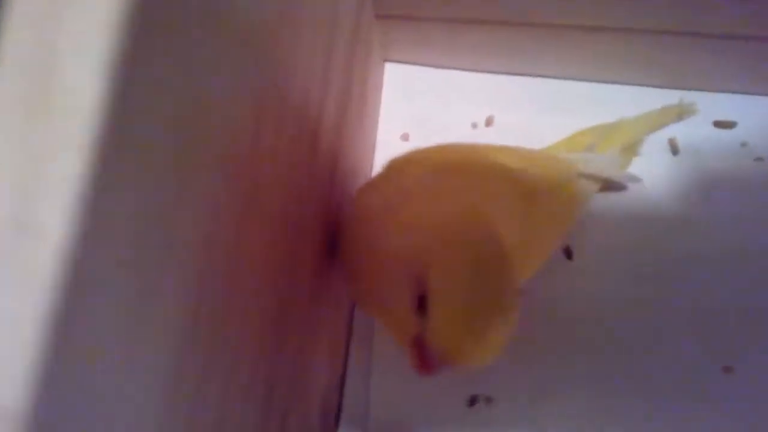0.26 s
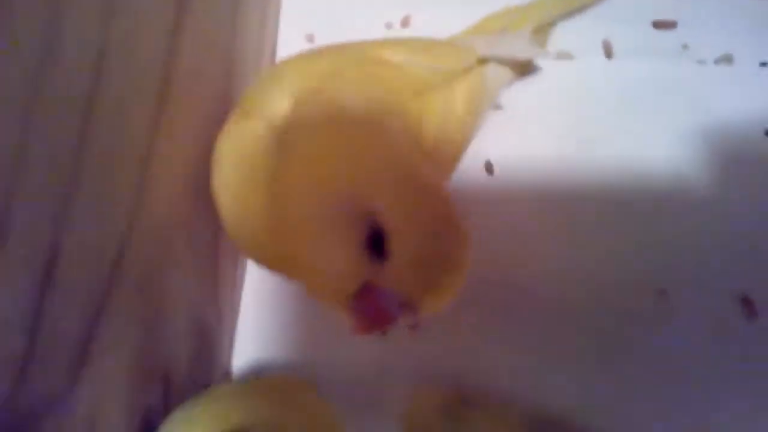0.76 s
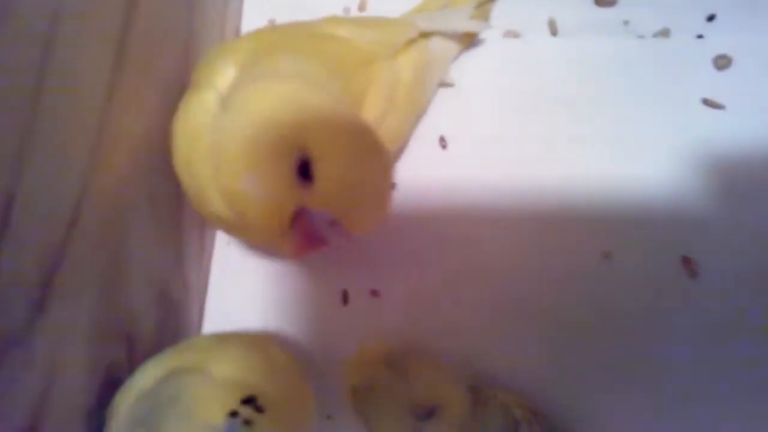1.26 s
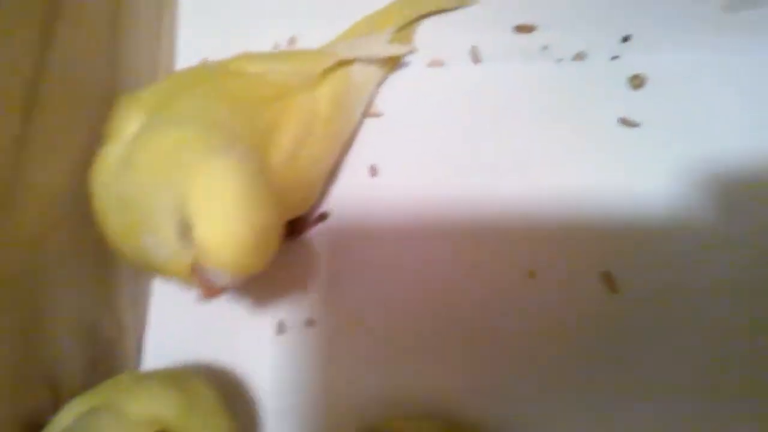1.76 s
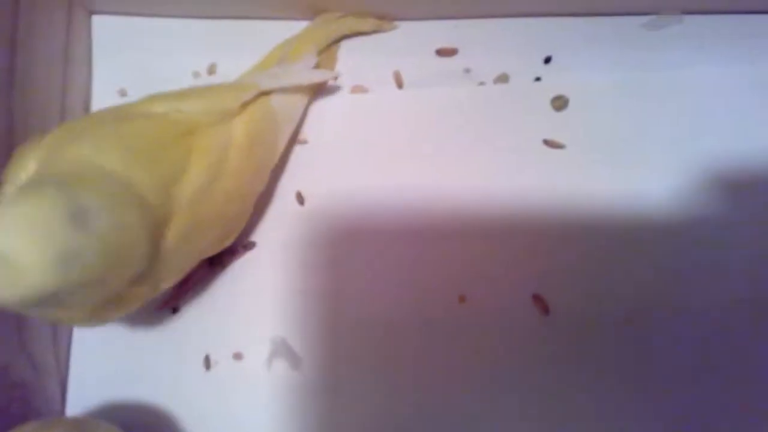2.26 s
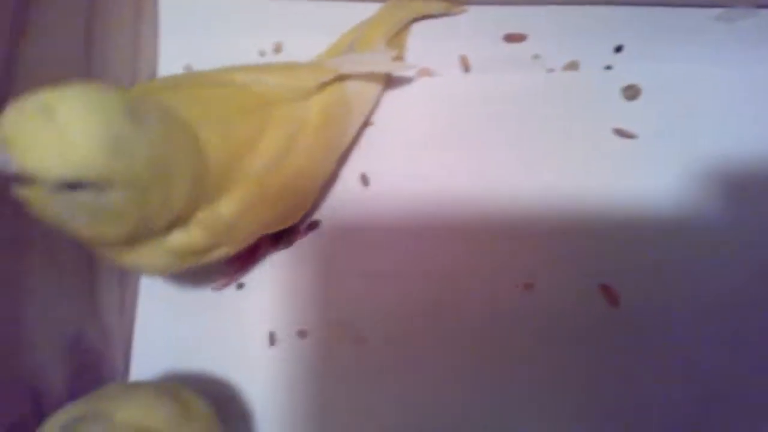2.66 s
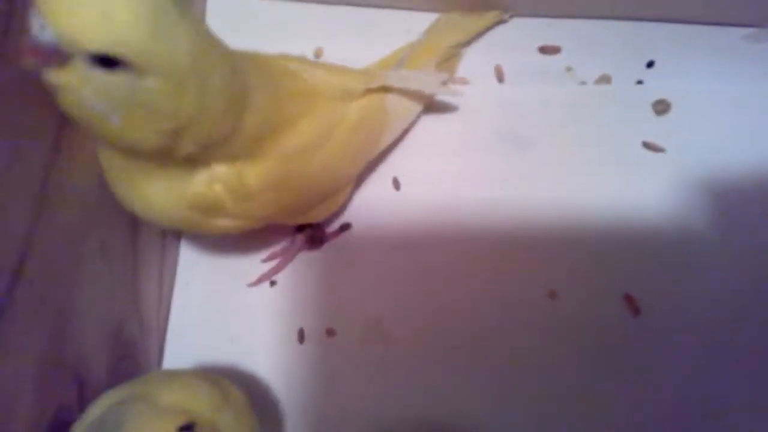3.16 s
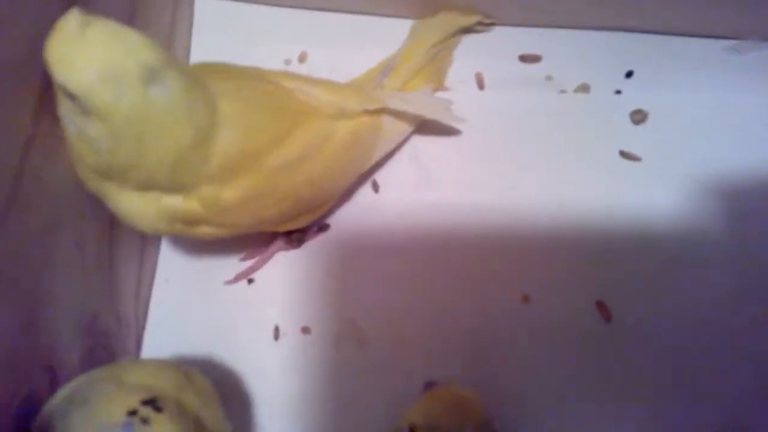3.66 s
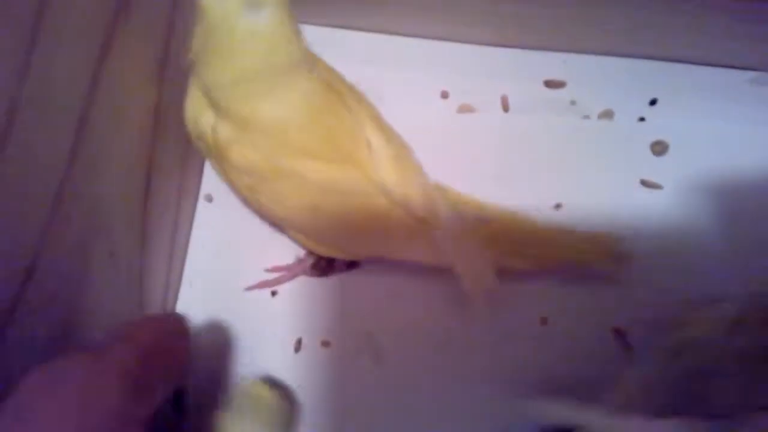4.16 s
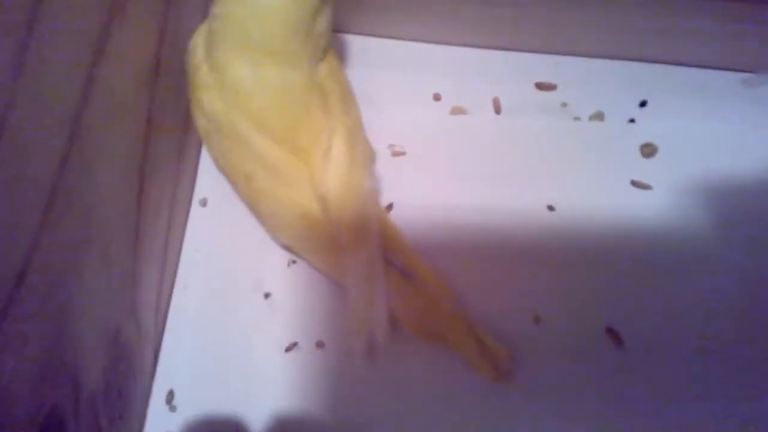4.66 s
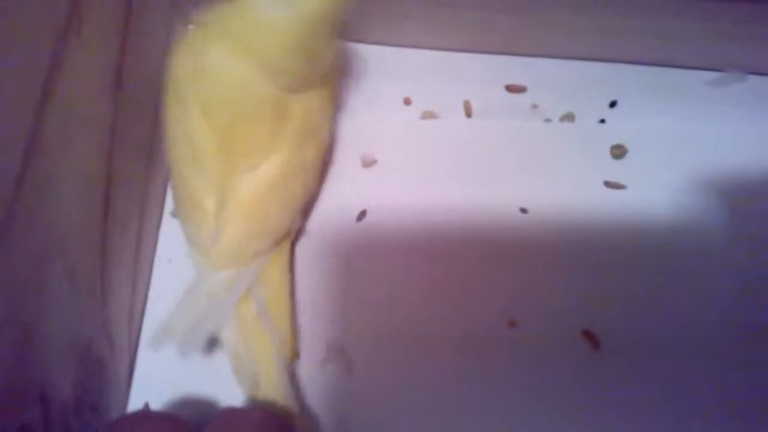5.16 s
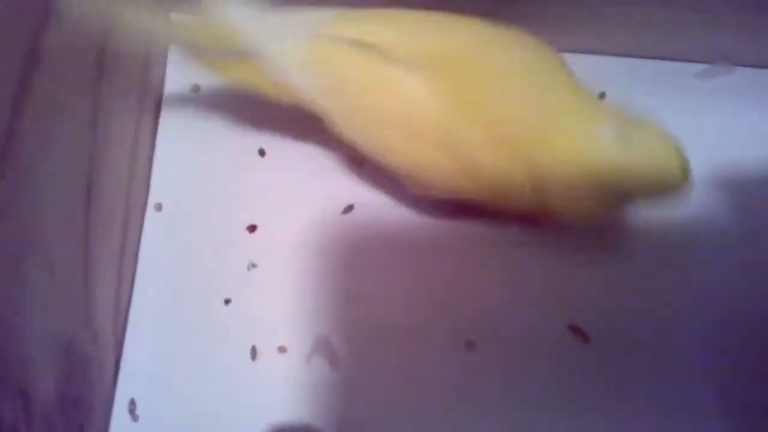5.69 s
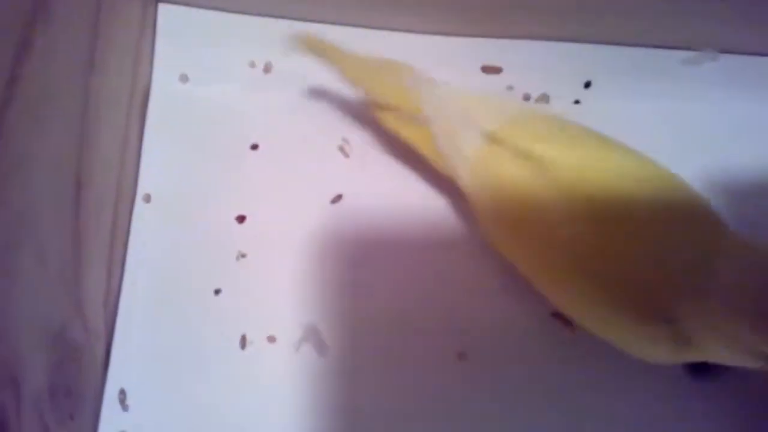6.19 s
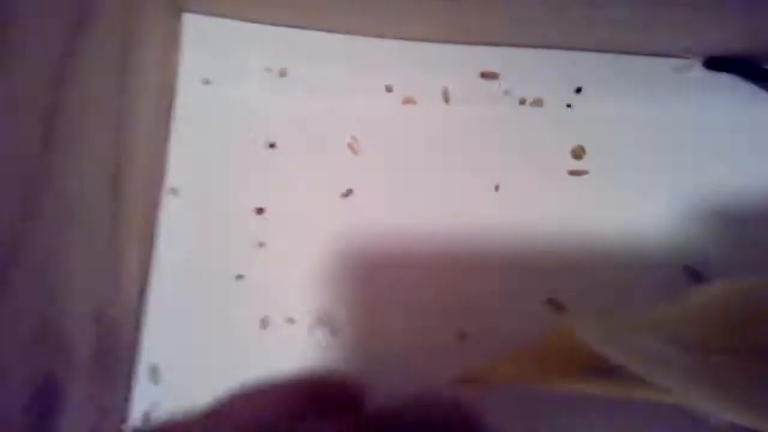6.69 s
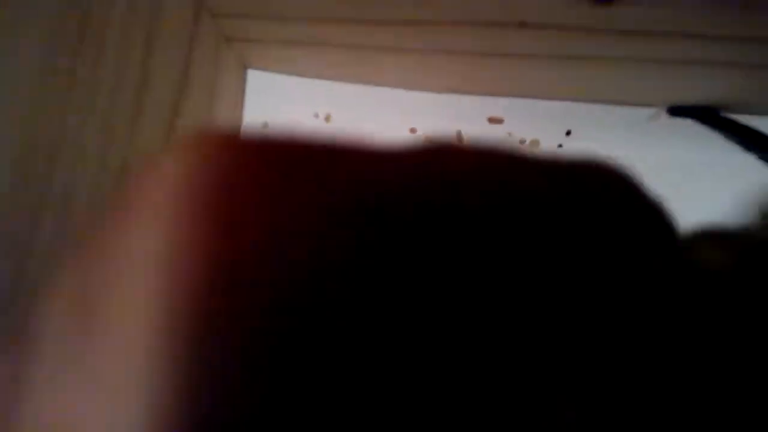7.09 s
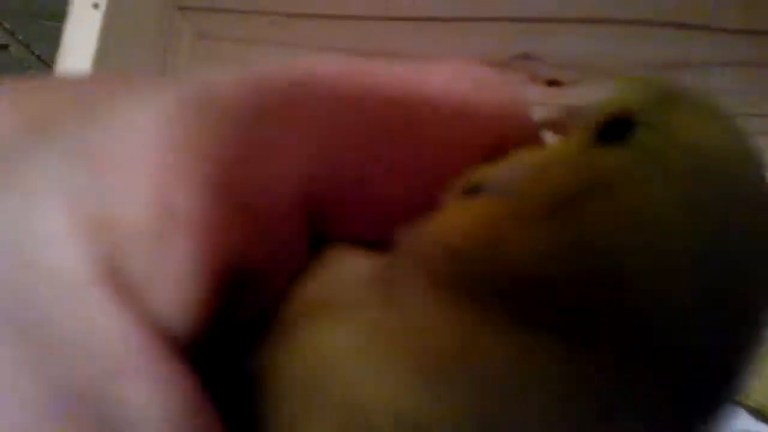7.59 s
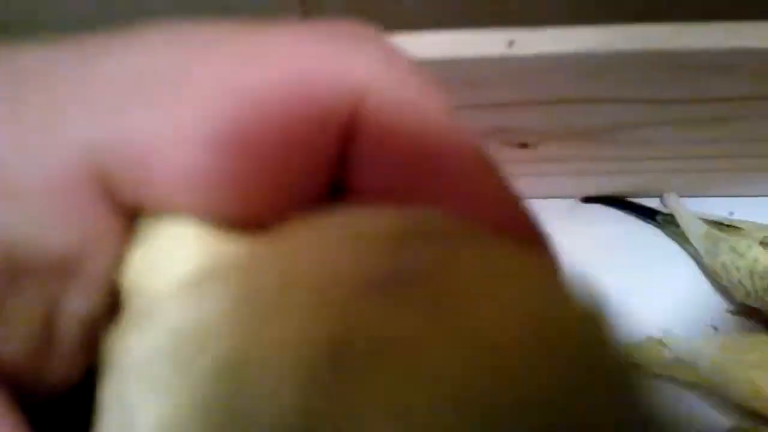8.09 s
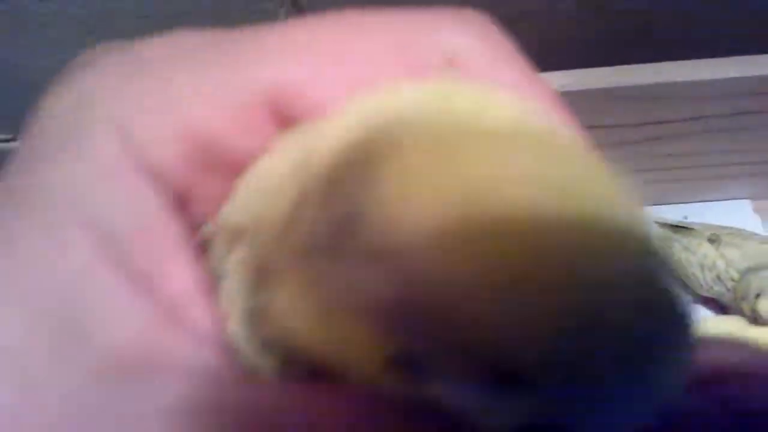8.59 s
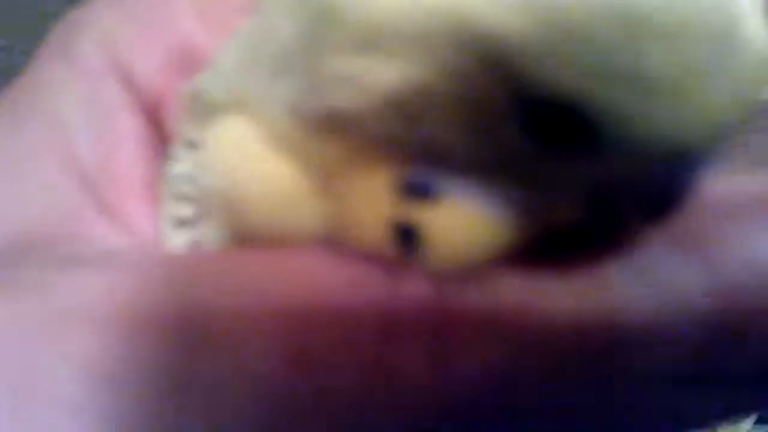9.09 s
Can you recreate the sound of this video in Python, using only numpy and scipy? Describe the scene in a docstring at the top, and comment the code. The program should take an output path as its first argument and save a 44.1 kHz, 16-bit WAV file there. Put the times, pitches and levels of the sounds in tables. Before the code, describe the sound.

Claw clicks, papery scratches and crackling husks patter irregularly over a hollow wooden floor, heard very near with slight steady hiss. The activity eases after a second and a half, bursts up around four seconds with woody knocks and scrapes, slackens, then becomes a quick hard scrabble near seven seconds. After that there is almost nothing but soft hiss and a tiny rustle.

```python
"""Parakeets in a nest box

Young parakeets shuffle on the sheet lining a small wooden nest box; a hand reaches in to lift one out.
Claws tick and skid among husks (resonant noise bursts, decaying grains); feet and knuckles thump the box
(rounded pushes into ringing modes); feathers and skin rub (noise under contact gains); short hollow scuffs
and rustles, of feet or hand, are noise in one resonance. Steady hiss lies underneath, joined by a faint
hiss around 4 kHz as the bustle dies away."""
import sys
import numpy as np
from scipy import signal
from scipy.fft import rfft, irfft
from scipy.io import wavfile

SR = 44100
rng = np.random.default_rng(int(sys.argv[2]) if len(sys.argv) > 2 else 0)


def master_out(mix):
    """Clip the mix to full scale and print it as 16-bit PCM to the path in sys.argv[1]."""
    frames = np.transpose(np.atleast_2d(mix))
    ceiling = np.clip(frames, -1, 1)
    pcm = np.round(ceiling * 32767).astype(np.int16)
    wavfile.write(sys.argv[1], SR, pcm)


N = 411879  # samples

# microphone and room noise spectrum, before overall scaling: f/Hz, density/dB per Hz
HISS_SPECTRUM = [(15, -62.5), (25, -20.5), (76, -2.5), (290, -2.5), (394, -3.5), (1010, -7.5),
                 (3370, -12.5), (4370, -15), (7000, -14), (8600, -33)]
HISS_RMS_DB = -62.5
BAND_TOP_HZ, CUTOFF_HZ = 8340, 9157

# bird activity as scratching on the sheet: t/s, level/dB
BUSTLE = [(0.0, -51.5), (0.55, -53.5), (0.82, -55.5), (1.2, -53), (1.4, -64), (1.94, -68.5), (2.3, -59),
          (2.55, -69.5), (3.45, -64), (3.9, -67), (4.05, -44.5), (4.35, -44.5), (4.7, -50), (5.55, -55.5),
          (6.2, -52.5), (7.25, -52.5), (7.45, -58.5), (7.76, -71), (8.4, -76)]
FLOOR_UNDER_DB, WALL_UNDER_DB = -11, -4.5  # bustle's rubbing on floor and wall, re scratching
# single sweeps of tail, wing or skin: start/s, length/s, sheet/dB, floor/dB, wall/dB
SWEEPS = [(0.162, 0.11, -48.5, -74, -50), (0.467, 0.072, -48.5, -61, -62), (0.58, 0.24, -51.5, -64, -51),
          (1.083, 0.14, -87, -51, -47), (2.38, 0.13, -58.5, -63, -65), (3.065, 0.11, -60.5, -65, -70),
          (3.193, 0.077, -52.5, -67, -70), (3.461, 0.13, -77, -74, -43.5), (3.979, 0.071, -44.5, -47, -58),
          (4.459, 0.055, -36.5, -62, -55), (4.94, 0.14, -43, -58, -40), (4.98, 0.26, -47.5, -76, -55),
          (5.19, 0.43, -56, -67, -53), (5.634, 0.098, -45, -75, -45.5), (5.757, 0.1, -54.5, -76, -77),
          (6.223, 0.14, -46, -45, -38), (6.605, 0.14, -47.5, -69, -66), (8.078, 0.2, -70, -70, -66)]
SWEEP_GRAIN = 0.63  # gain of husk crackle in a sweep, re brushing
# hand dragging along the boards: t/s, floor/dB, wall/dB
HAND_DRAG = [(3.5, -73, -65), (3.62, -71, -35.5), (3.68, -50, -50), (3.74, -49.5, -35.5),
             (3.86, -48.5, -33.5), (4.12, -53.5, -40), (4.28, -47.5, -33.5), (4.54, -56.5, -53.5),
             (4.8, -53, -41)]
# lining sheet resonances: f/Hz, width/Hz, level/dB
SHEET_MODES = [(960, 870, -9), (2143, 208, 0.5), (2680, 5450, -4), (4790, 3540, 0), (5900, 1220, -4.5)]

# claw and husk ticks: t/s, snap peak/dB, contact pitch f/Hz, skid re snap peak/dB
TICKS = [(0.0014, -14, 4230, -12), (0.0528, -24.5, 3570, -3.5), (0.187, -27, 3550, 1),
         (0.3096, -32, 3270, 5), (0.3418, -15.5, 2500, -10.5), (0.415, -37.5, 2730, 0),
         (0.457, -23, 3540, -2), (0.4743, -23, 3470, -12), (0.52, -31.5, 3430, -6), (0.5526, -33, 4900, -5),
         (0.582, -40, 3680, 3), (0.709, -23.5, 3770, -3), (0.764, -32, 3900, -18), (0.7717, -28, 3800, -8),
         (0.7842, -28.5, 5800, -14), (0.852, -24.5, 4350, -6), (0.951, -34, 5730, -23),
         (0.9842, -27.5, 4400, -4), (1.019, -29, 2420, -9), (1.082, -34.5, 4770, -31),
         (1.1037, -33, 5870, -29), (1.1137, -34, 4130, -3.5), (1.154, -31, 3750, -14),
         (1.1912, -40, 1450, 1), (1.2612, -29, 4600, -20), (1.2897, -14, 3600, -18),
         (1.3224, -27.5, 4340, -18), (1.455, -38, 4400, -34), (1.5277, -16, 4700, -21),
         (1.5357, -32, 5960, -4), (1.5575, -30, 5600, -6), (1.5847, -34.5, 4700, -14),
         (1.6125, -41.5, 5400, -15), (1.9923, -40, 3900, -4), (2.0398, -24.5, 4400, -12),
         (2.0436, -24.5, 2370, -6.5), (2.177, -27.5, 5300, -47), (2.2532, -23.5, 3960, -10),
         (2.362, -24, 4050, -9.5), (2.717, -30, 5900, -6.5), (2.808, -27.5, 2070, -2.5),
         (3.1398, -28, 4800, -4), (3.2022, -32.5, 5360, -12), (3.9187, -22, 3920, -11.5),
         (4.001, -26, 5500, -10), (4.1689, -23.5, 3630, -5), (4.208, -14, 2950, -11),
         (4.2604, -31, 2330, -29), (4.2864, -21, 3920, -8), (4.32, -27, 1960, -23),
         (4.3532, -14, 3360, -12), (4.3634, -17.5, 3480, -35), (4.3941, -12.5, 2950, -4),
         (4.4425, -21.5, 1670, -7), (4.5633, -26, 6800, -15), (4.57, -14.5, 2340, -14.5),
         (4.629, -19.5, 2400, -30), (4.6502, -15.5, 1580, -17), (4.8174, -22, 2180, -12),
         (4.875, -26.5, 3280, -8.5), (4.9355, -17, 2210, -14), (5.0431, -17.5, 4630, -4.5),
         (5.1991, -20, 1500, -5), (5.4378, -25, 6310, -17), (5.468, -39, 3900, 0),
         (5.585, -27.5, 3200, 1.5), (5.6, -25.5, 3150, -10), (5.699, -22.5, 4070, -3),
         (5.7544, -30, 3500, 4), (5.919, -29, 4230, -7), (5.9774, -32, 3430, -9),
         (6.0038, -29.5, 3700, 1.5), (6.135, -30.5, 3260, -10), (6.1519, -34, 3700, -1),
         (6.258, -17.5, 2530, -14.5), (6.2921, -19, 6130, -14), (6.3574, -14, 3270, -20.5),
         (6.4202, -32, 6270, -17), (6.4845, -25, 3370, 4), (6.5573, -36.5, 2020, -2.5),
         (6.6419, -25, 4370, -5), (6.7615, -8.5, 2890, -25), (6.789, -32, 3440, 2),
         (6.8378, -30.5, 4050, -1), (6.8754, -14, 3450, -21), (6.932, -30.5, 3960, -4),
         (6.9494, -14, 3360, -8.5), (6.9772, -30, 2800, -14), (7.119, -25, 3900, -8.5),
         (7.195, -13, 3480, -29), (7.256, -32, 3850, -16), (7.2692, -11.5, 3570, -21),
         (7.2818, -26.5, 1940, -2.5), (7.3373, -21, 3360, -9), (7.3718, -16.5, 2800, -9),
         (7.4286, -17, 3030, -20)]
SNAP_RISE_S, SKID_RISE_S = 0.00039, 0.0025
SNAP_EDGE = 1.6  # gain during the rise: first contact is hardest
SNAP_MID_HZ = 3200  # snaps pitched above this are shorter
BOUNCE_MAX_S, BOUNCE_MIN_DB = 0.006, -20  # next toe: latest delay, softest level before skid weighting
SKID_REF_T60_S, SKID_REF_DB = 0.05, -25.5  # skid decay at a reference skid level
SKID_SHORTENS = 0.2  # harder skids stop sooner: dB of length lost per dB of level
SETTLE_DB, SETTLE_T60_S = -16.5, 0.17  # husks settling, re skid
CORNER_UNTIL_S, MID_FLOOR_DB = 3.3, 0.5  # bird leaves the corner; claw drive gain afterwards
CORNER_STEP_DB = 8  # until then the toes of each footfall also press as claw tips do

# feet and knuckles on the boards: t/s, floor blow/dB, wall blow/dB
THUMPS = [(0.002, -37, -46), (0.053, -38, -57), (0.188, -39, -42), (0.345, -40, -76), (0.584, -51, -40),
          (0.851, -50, -38), (1.026, -40, -69), (1.111, -40.5, -61), (1.526, -41, -41), (2.038, -41.5, -38),
          (2.257, -40, -65), (2.367, -41.5, -60), (2.81, -34.5, -46.5), (3.135, -36.5, -57),
          (3.601, -61, -22), (3.74, -65, -25), (3.916, -30, -41), (4.207, -33.5, -53), (4.395, -28, -26.5),
          (4.568, -63, -29.5), (4.629, -28, -31.5), (5.002, -28, -60), (5.749, -51, -40),
          (6.005, -50, -40.5), (6.155, -37.5, -41.5), (6.256, -51, -35), (6.296, -48, -39),
          (6.487, -31.5, -49), (6.6411, -27.5, -38), (6.763, -67, -52), (6.947, -32.5, -35.5),
          (7.108, -33, -52), (7.198, -33, -35.5), (7.272, -32, -42)]
# box modes: f/Hz, floor drive/dB, wall drive/dB, claw tip drive/dB, t60/s
BOX_MODES = [(179.4, 0, -19, -28, 0.19), (214, -7.5, -20.5, -30, 0.061), (258.1, -54, -3, -36, 0.12),
             (346, -6, -9, -35.5, 0.042), (462.5, -11.5, -19.5, -24, 0.078), (562.3, -57.5, -13, -42, 0.13),
             (708, -10.5, -16.5, -49.5, 0.032), (907, -22, -15, -47.5, 0.035),
             (1116, -11.5, -14, -29.5, 0.053), (1488, -20.5, -21.5, -33.5, 0.05),
             (1840, -28, -20, -24, 0.047), (2280, -28.5, -32, -40.5, 0.035)]
BOX_LOW_HZ = 176  # box too small to radiate below this
SPOT_DB, SPOT_RATE_HZ = 2.2, 8  # drive spread per mode as the touched spot moves

# short hollow scuffs and rustles, of feet or hand: start/s, length/s, pitch f/Hz, level/dB
SCUFFS = [(0.179, 0.12, 960, -49.5), (0.997, 0.15, 1020, -60.5), (2.414, 0.049, 910, -56),
          (3.49, 0.078, 1140, -51.5), (5.76, 0.73, 926, -59.5), (6.237, 0.098, 560, -41),
          (8.153, 0.067, 2270, -67)]
# faint hiss around 4 kHz as the bustle dies away: t/s, level/dB
FAINT_HISS = [(7.8, -85), (8.05, -69.5), (8.9, -66.5), (9.3, -70)]
FAINT_HISS_HZ, FAINT_HISS_WIDTH_HZ = 4170, 1600


def amp(db):
    """Gain of a level in dB."""
    return 10 ** (np.asarray(db) / 20)


def rms_one(x):
    """Scale to rms 1."""
    return x / np.sqrt(np.mean(x ** 2) + 1e-20)


def drift(rate_hz):
    """Slow random wander of rms 1: noise through two equal low-pass poles."""
    r = np.exp(-2 * np.pi * rate_hz / SR)
    wander = signal.lfilter([1], [1, -2 * r, r * r], rng.standard_normal(N + SR))
    return rms_one(wander[SR:])  # skip the filter's start-up


def resonance(x, hz, width_hz):
    """Two-pole band-pass with peak gain 1."""
    r = np.exp(-np.pi * width_hz / SR)
    zeros = np.array([1, 0, -1]) * (1 - r * r) / 2
    return signal.lfilter(zeros, [1, -2 * r * np.cos(2 * np.pi * hz / SR), r * r], x)


def in_time(rows, fade_s=0.14):
    """Gains of a table's dB columns, interpolated in dB and faded out at its end."""
    s, *levels_db = np.transpose(rows)
    t = np.arange(N) / SR
    fade = np.clip((s[-1] - t) / fade_s, 0, 1)
    return fade * amp([np.interp(t, s, db) for db in levels_db])


def hiss():
    """Steady microphone and quiet-room noise, shaped in the spectrum."""
    hz, db = np.transpose(HISS_SPECTRUM)
    grid_hz = np.maximum(np.fft.rfftfreq(N, 1 / SR), 1)
    gain = amp(np.interp(np.log(grid_hz), np.log(hz), db))
    return amp(HISS_RMS_DB) * rms_one(irfft(rfft(rng.standard_normal(N)) * gain, N))


def sheet(x):
    """Lining sheet: broad resonances side by side, alternating in sign."""
    return sum((-1) ** k * amp(db) * resonance(x, hz, width_hz)
               for k, (hz, width_hz, db) in enumerate(SHEET_MODES))


def crackle(chance, per_s, spread_db, t60_s):
    """Envelope of tiny slips from uniform draws: each jumps up at once and dies fast."""
    share = per_s / SR
    sizes_db = -spread_db * np.log(np.clip(chance / share, .02, 1))
    slips = (chance < share) * amp(sizes_db)
    return signal.lfilter([1], [1, -amp(-60 / (t60_s * SR))], slips + 1e-18)


def patchy(x, patchy_db=2.5, rate_hz=12.0):
    """Bands two thirds of an octave apart come and go independently as the rubbed spot changes."""
    centres_hz = 500 * 2 ** np.arange(0, 4.1, 2 / 3)
    return sum((-1) ** k * amp(patchy_db * drift(rate_hz)) * resonance(x, hz, hz / 2)
               for k, hz in enumerate(centres_hz))


def contact():
    """Friction gains: bustle on sheet, sweeps on sheet, then floor and wall with all sources power-summed."""
    bustle = in_time(BUSTLE)
    under = bustle * amp([[FLOOR_UNDER_DB], [WALL_UNDER_DB]])
    power = np.vstack([np.zeros(N), under ** 2])  # sheet sweeps, floor, wall
    hand_in = np.arange(N) / SR > HAND_DRAG[0][0]
    power[1:] += (in_time(HAND_DRAG) * hand_in) ** 2
    for s, length_s, *levels_db in SWEEPS:
        swell = np.hanning(round(length_s * SR))
        at = round(s * SR)
        power[:, at:at + len(swell)] += (amp(levels_db)[:, None] * swell) ** 2
    return np.vstack([bustle, np.sqrt(power)])


def shuffle(floor_rub_db=-20.5, wall_rub_db=-25.5, skin_db=-14.0, skin_hz=1600):
    """Brushing and husk crackle on the sheet plus direct dull rub; also smooth friction on floor and wall."""
    bustle, sweep, *rub = contact()
    husks_per_s = 220 * amp(3.5 * drift(14))  # clumps
    husks = crackle(rng.random(N), husks_per_s, spread_db=3.5, t60_s=.008)
    bright_husks = crackle(rng.random(N), husks_per_s, spread_db=4.5, t60_s=.007)
    brush = 0.85 * amp(2.5 * drift(25))
    noise = rng.standard_normal((5, N))

    bright = resonance(bright_husks * noise[1], 4060, 2300)
    crackles = patchy(sheet(husks * noise[0]) + 0.58 * bright)
    brushed = patchy(sheet(brush * noise[0]))
    steady = rms_one(brushed + crackles)
    swept = rms_one(rms_one(brushed) + SWEEP_GRAIN * rms_one(crackles))
    scraped = bustle * steady + sweep * swept

    dull = resonance(resonance(noise[2], skin_hz, 2900), skin_hz, 2900)
    skin = amp(skin_db) * rub[1] * rms_one(dull)  # follows the wall rub
    unevenness = amp(0.49 * drift(11.0))
    friction = rub * noise[3:] * unevenness * amp([[floor_rub_db], [wall_rub_db]])
    return scraped + skin, friction


def ticks(snap_t60_s=0.011, q=3.64, broad_db=-2.0):
    """Each claw snaps at its own pitch, then skids in small slips; also returns contact force impulses."""
    length = round(.25 * SR)
    t = np.arange(length) / SR
    out, force = np.zeros(N + length), np.zeros(N)
    noise = rng.standard_normal((len(TICKS), 2, length))
    chance = rng.random((len(TICKS), length))
    grips = .55 + crackle(chance, per_s=260, spread_db=2.4, t60_s=0.012)
    toes = rng.random((len(TICKS), 2)) * [BOUNCE_MAX_S, BOUNCE_MIN_DB]
    for (s, db, hz, skid_db), (snap, skid), grip, (toe_s, toe_db) in zip(TICKS, noise, grips, toes):
        decay = amp(-60 * t / snap_t60_s * max(hz / SNAP_MID_HZ, 1))
        touch = decay * (1 - np.exp(-t / SNAP_RISE_S))
        next_toe = amp(toe_db + skid_db / 2) * np.interp(t - toe_s, t, touch)
        snap = np.where(t < SNAP_RISE_S, snap * SNAP_EDGE, snap)
        hit = snap * (touch + next_toe)
        hit = resonance(hit, hz, hz / q) + amp(broad_db) * sheet(hit) / 2
        hit = resonance(hit, 1300, 10000)  # light claw tip: little bass

        skid_t60_s = SKID_REF_T60_S * amp(SKID_SHORTENS * (SKID_REF_DB - skid_db))
        slips = rms_one(sheet(skid * grip) + 0.33 * resonance(skid * grip, hz, hz / 2))
        skid_decay = amp(-60 * t / skid_t60_s) + amp(SETTLE_DB - 60 * t / SETTLE_T60_S)
        skid_env = skid_decay * (1 - np.exp(-t / SKID_RISE_S))
        tick = hit / np.abs(hit).max() + amp(skid_db) * skid_env * slips

        at = max(round(s * SR), 0)
        out[at:at + length] += amp(db) * tick
        force[at] = amp(db + MID_FLOOR_DB * (s > CORNER_UNTIL_S))
    return out[:N], force


def thumps(soft_hz=1200):
    """Soft blows: impulses low-passed into rounded pushes on floor and wall."""
    pushes = np.zeros((2, N))
    at = [round(row[0] * SR) for row in THUMPS]
    pushes[:, at] = amp(np.transpose(THUMPS)[1:])
    return signal.sosfilt(signal.butter(2, soft_hz, fs=SR, output="sos"), pushes)


def ring(x, hz, t60_s):
    """Two-pole mode: a unit click rings a decaying sine of initial height 1."""
    r, w = amp(-60 / (t60_s * SR)), 2 * np.pi * hz / SR
    return signal.lfilter([0, np.sin(w)], [1, -2 * r * np.cos(w), r * r], x + 1e-18)


def box(drives):
    """Hollow box: floor, wall and claw tips each drive their own share of the ringing modes."""
    modes = np.zeros(N)
    for k, (hz, *shares_db, t60_s) in enumerate(BOX_MODES):
        drive = amp(shares_db) @ drives
        spot = amp(SPOT_DB * drift(SPOT_RATE_HZ))
        modes += (-1) ** k * ring(drive * spot, hz, t60_s)
    return signal.sosfilt(signal.butter(3, BOX_LOW_HZ, "high", fs=SR, output="sos"), modes)


def scuffs(q=5.1, rough_db=0.0):
    """Short hollow scuffs and rustles: noise through one resonance, twice over, swelling and fading."""
    out = np.zeros(N)
    rough = rng.standard_normal(N) * amp(rough_db * drift(40))
    for s, length_s, hz, db in SCUFFS:
        at, size = round(s * SR), round(length_s * SR)
        hollow = resonance(resonance(rough[at:at + size], hz, hz / q), hz, hz / q)
        out[at:at + size] += amp(db) * np.hanning(size) * rms_one(hollow)
    return out


def faint_hiss():
    """Noise in one high band, gated on late in the scene."""
    band = resonance(rng.standard_normal(N), FAINT_HISS_HZ, FAINT_HISS_WIDTH_HZ)
    started = np.arange(N) / SR > FAINT_HISS[0][0]
    return in_time(FAINT_HISS)[0] * started * rms_one(band)


def scene():
    """Sum of all sources at one microphone held over the box."""
    scratch, friction = shuffle()
    claws, claw_force = ticks()
    blows = thumps()
    in_corner = np.arange(N) / SR < CORNER_UNTIL_S
    toes = amp(CORNER_STEP_DB) * blows[0] * in_corner
    boards = box(np.vstack([blows + friction, claw_force + toes]))
    return (hiss() + scratch + claws + boards + scuffs() + faint_hiss())[None]


def record(dry):
    """Band limit of the sound file: steep low-pass, then a band cut."""
    limited = signal.sosfilt(signal.butter(14, BAND_TOP_HZ, fs=SR, output="sos"), dry)
    return signal.sosfilt(signal.cheby2(6, 25, CUTOFF_HZ, fs=SR, output="sos"), limited)


dry = scene()
out = record(dry)
master_out(out)
```